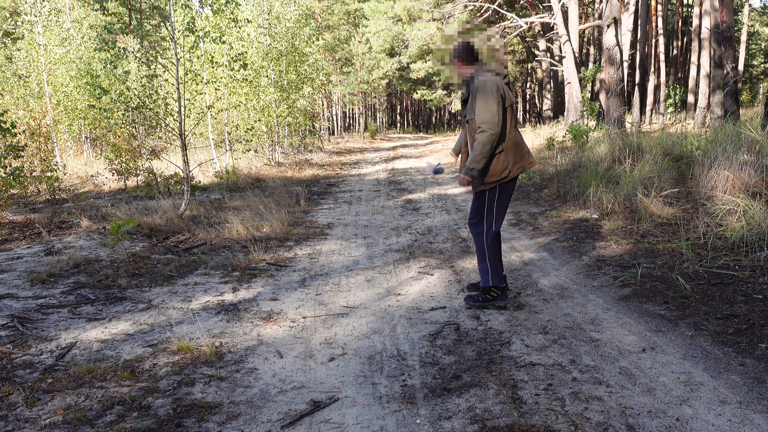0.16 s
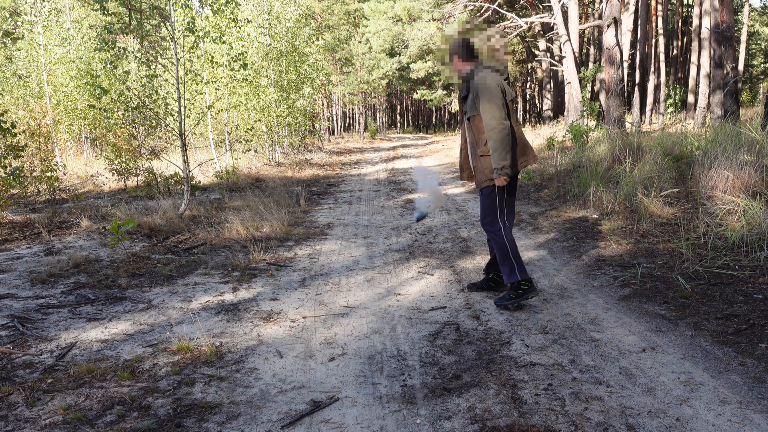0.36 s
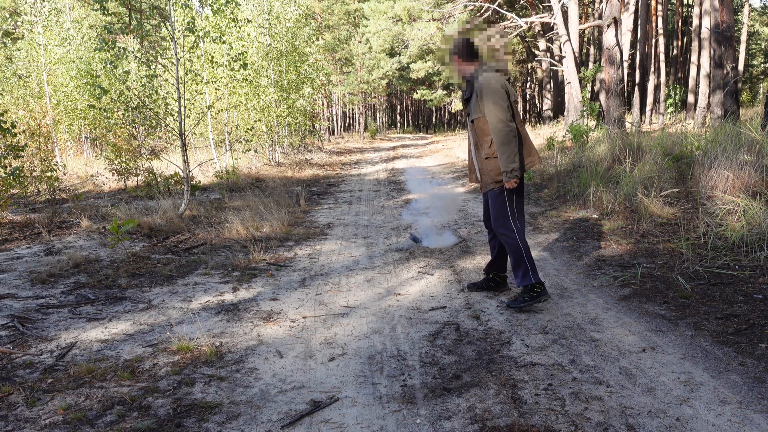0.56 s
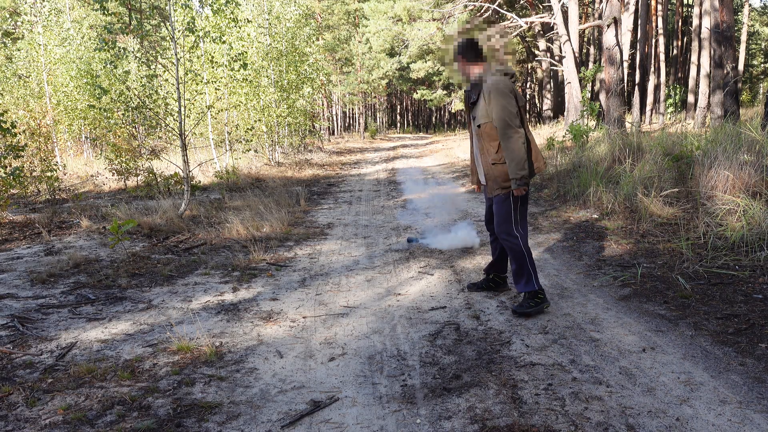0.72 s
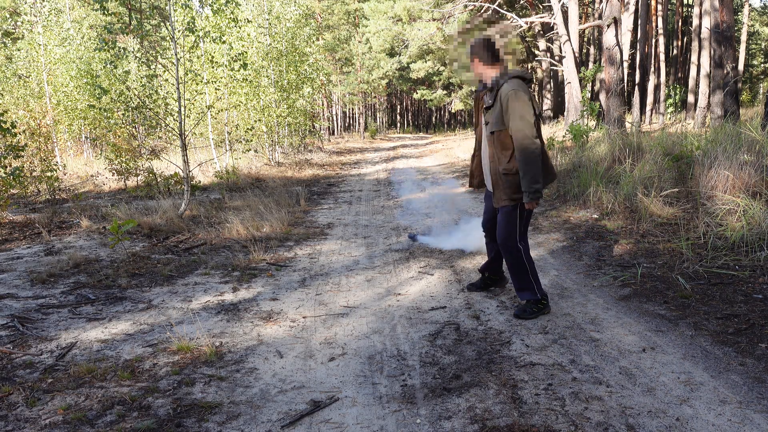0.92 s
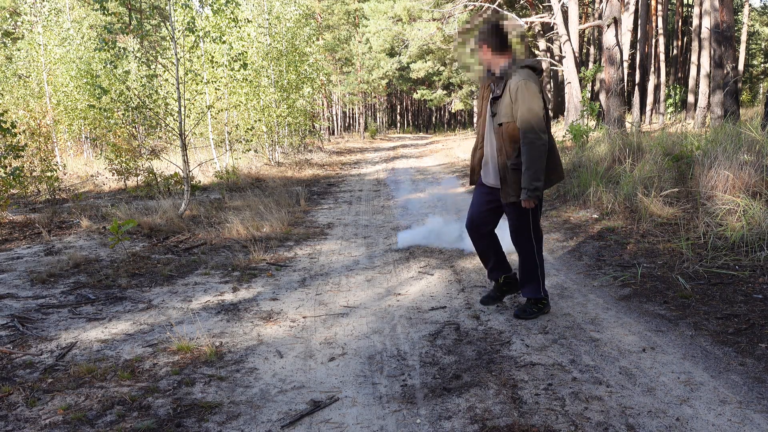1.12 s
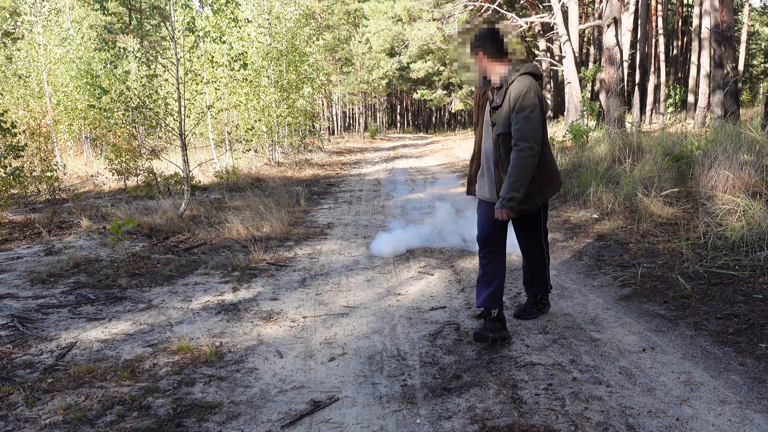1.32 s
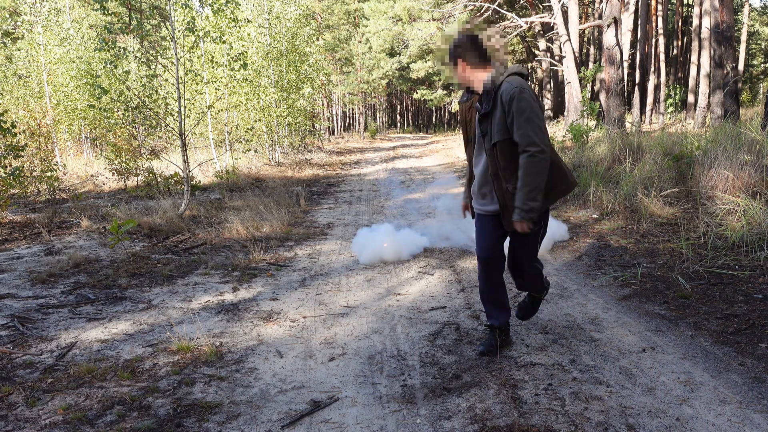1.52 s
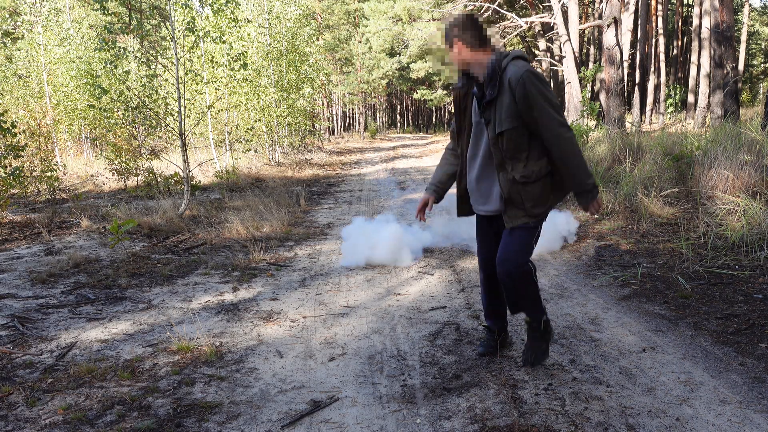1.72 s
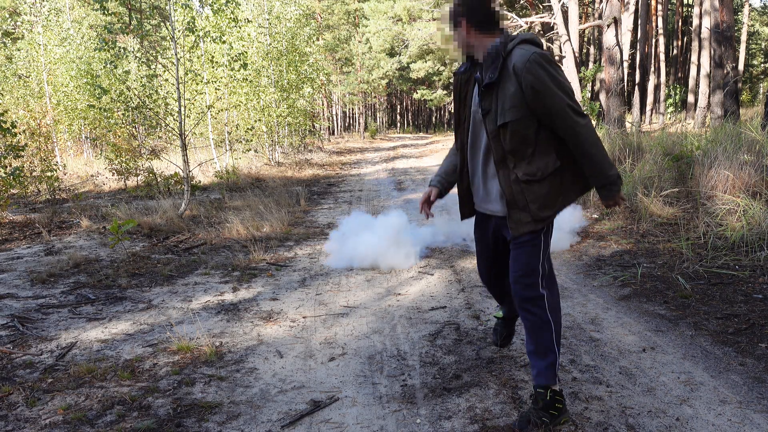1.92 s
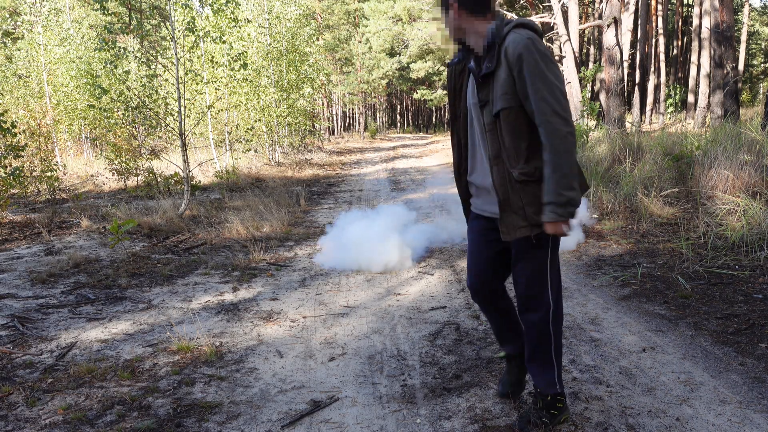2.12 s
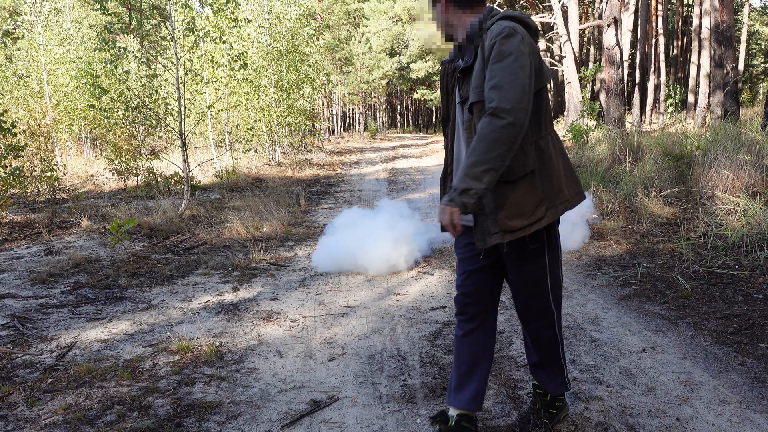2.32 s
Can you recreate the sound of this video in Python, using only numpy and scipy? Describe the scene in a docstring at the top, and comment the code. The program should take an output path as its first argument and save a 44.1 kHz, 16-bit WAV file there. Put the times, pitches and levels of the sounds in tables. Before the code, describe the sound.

A smoke canister hisses outdoors. After a moment of faint forest air, a sharp double crack with a brief metallic ring comes at 0.07 s, and a gas jet bursts out at once. The hiss starts smooth and strong, dips and swings in brightness as it tumbles, turns thinner and hollow around 0.6-1.2 s, surges near 1.3 s, then spits and crackles densely until the end at about 2.4 s.

```python
"""Forest air; at 0.07 s a thrown smoke canister cracks alight: noise bursts, the second ringing the casing.
A jet vents at once: smooth hiss in five bands, with spurts and ever more spitting crackle.
It tumbles over the sandy track, so its brightness swings; delayed copies off casing and sand notch the hiss.
From about 0.6 s it lies on its side and a resonance is hollowed out of the hiss, until about 1.27 s."""
import sys
import numpy as np
from scipy import signal
from scipy.fft import rfft, irfft
from scipy.io import wavfile
from scipy.ndimage import map_coordinates

SR = 44100
rng = np.random.default_rng(int(sys.argv[2]) if len(sys.argv) > 2 else 0)


def log_audio(samples):
    """Write samples as a 16-bit WAV file to the path given in sys.argv[1]."""
    # one column per channel
    frames = np.atleast_2d(samples).T
    # limit to full scale, then quantise
    limited = np.clip(frames, -1, 1)
    pcm = np.round(limited * 32767).astype(np.int16)
    wavfile.write(sys.argv[1], SR, pcm)


N = 104120
TIME_S = np.arange(N) / SR
FREQ_HZ = np.maximum(np.fft.rfftfreq(N, 1 / SR), 1)


def amp(db):
    """dB to amplitude factor."""
    return 10 ** (np.asarray(db) / 20)


def rms_one(x):
    """Scale each row to RMS 1."""
    return x / np.sqrt(np.mean(x ** 2, axis=-1, keepdims=True) + 1e-20)


def in_time(rows):
    """Interpolate each table column over the scene's time."""
    at_s, *columns = np.transpose(rows)
    return [np.interp(TIME_S, at_s, column) for column in columns]


def coloured(x, points, weight=1):
    """Filter by a (hz, db) table, interpolated over log frequency."""
    at_hz, db = np.transpose(points)
    gain = amp(np.interp(np.log(FREQ_HZ), np.log(at_hz), db))
    return irfft(rfft(x) * gain * weight, N)


def drift(rate_hz):
    """Slow random wander of RMS 1: noise through a double one-pole low-pass."""
    r = np.exp(-2 * np.pi * rate_hz / SR)
    noise = rng.standard_normal(N + SR)
    return rms_one(signal.lfilter([1], [1, -2 * r, r * r], noise)[SR:])


def low(x, hz):
    """Second-order low-pass."""
    return signal.sosfilt(signal.butter(2, min(hz, 19000), fs=SR, output="sos"), x)


def high(x, hz):
    """Second-order high-pass."""
    return signal.sosfilt(signal.butter(2, hz, "high", fs=SR, output="sos"), x)


# forest air level: time_s, level_db
AIR_LEVEL = [(0, -53.5), (.07, -53.5), (.15, -49), (2.36, -54.5)]
# forest air spectrum: freq_hz, density_db_per_hz (relative)
AIR_COLOUR = [(24, -61), (40, -40), (139, -8.5), (408, -16), (841, -6), (1460, -20), (1610, -10.5),
              (15600, -25)]


def forest_air():
    """Steady broadband air as coloured noise; two independent rows: mid, side."""
    level_db, = in_time(AIR_LEVEL)
    return amp(level_db) * rms_one(coloured(rng.standard_normal((2, N)), AIR_COLOUR))


# ignition cracks: start_s, level_db (before halving and flattening), hold_s, ring_share (0-1)
CRACKS = [(.0701, -13, .0004, .2), (.0722, -3, .0017, 1)]
# crack noise spectrum: freq_hz, gain_db
CRACK_COLOUR = [(100, -30), (600, -16), (1500, -4), (3000, 0), (9000, -2), (15000, -6)]
# casing ring modes: freq_hz, level_db (peak against noise RMS)
CRACK_RINGS = [(850, -8), (1500, 1), (3050, -3), (3900, 3)]
CRACK_TAIL_S, CRACK_TOP, CRACK_BASS_CUT_HZ = .0005, .36, 280


def cracks():
    """Noise and casing-ring bursts, held, then decaying exponentially; peaks saturate."""
    noise = rms_one(coloured(rng.standard_normal((2, N)), CRACK_COLOUR))
    out = 0
    for start_s, level_db, hold_s, ring_share in CRACKS:
        age_s = TIME_S - start_s
        modes = sum(amp(db) * np.sin(2 * np.pi * hz * age_s) for hz, db in CRACK_RINGS)
        ring = ring_share * modes * [[1], [0]]   # mid only
        envelope = (age_s > 0) * np.exp(-np.maximum(age_s - hold_s, 0) / CRACK_TAIL_S)
        out = out + amp(level_db) * envelope * (noise + ring) / 2
    flat = CRACK_TOP * np.tanh(out / CRACK_TOP)
    return high(flat, CRACK_BASS_CUT_HZ)


# jet levels before flutter, spurts and trim:
# time_s, presence_db, then against presence: bass_db, low_mid_db, treble_db, top_treble_db
JET = [(0.08, -25, -21, -12, -6, -8), (0.092, -27, -21, -3, -7, 0), (0.1, -19.5, -18.5, -3, 1, -4.5),
       (0.21, -18, -18.5, 2, -6, -11.5), (0.31, -27, -20, 2.5, -10, -24), (0.36, -31, -13, 4, -10, -9.5),
       (0.46, -30, -15.5, 5, 0.5, 1.5), (0.49, -24.5, -13, 0.5, -1, -4), (0.55, -30.5, -11.5, 2, 2, 6),
       (0.58, -27.5, -17, -4, -2.5, 1), (0.61, -30, -16, 1, -2, 2), (0.77, -28.5, -19, -1, 4, 11),
       (0.81, -25, -22.5, -7, -3.5, -0.5), (0.93, -32, -18, -1.5, 2.5, 4.5),
       (1.02, -29.5, -21.5, -3.5, 3, 8.5), (1.11, -25.5, -20, -6, -7.5, -8),
       (1.24, -27.5, -26.5, -0.5, -4.5, 0.5), (1.275, -17, -21.5, -5.5, -3.5, -4.5),
       (1.37, -17, -14.5, -3.5, -9, -6.5), (1.54, -23.5, -20.5, -4, -12, -10),
       (1.64, -26, -16.5, -6, -2.5, -9), (1.66, -23.5, -15.5, -6.5, -5, -8), (1.68, -29, -33, -5.5, 3, -5),
       (1.73, -24.5, -17.5, -13, -4, -6), (1.77, -31, -28, -3.5, 2, -1), (1.84, -24, -17, -8.5, -1, -5),
       (1.86, -29, -16, 0, 1, 0), (1.87, -26.5, -20, -10, 1, 1), (1.96, -23, -29, -9.5, 1.5, 4.5),
       (2.0, -26.5, -29, -9.5, 7.5, 8), (2.02, -24, -21.5, -6.5, 5.5, 7.5), (2.16, -20, -21, -10, 1, 0.5),
       (2.18, -16.5, -16.5, -6.5, 0, -2), (2.24, -20, -10.5, -3.5, 0.5, -1.5),
       (2.26, -22.5, -21, -7.5, 3, 2), (2.3, -16.5, -9.5, -6.5, -4, -3), (2.36, -20, -10.5, -11, -1, -3)]
# band centres in JET column order: centre_hz
BAND_HZ = [4000, 500, 1500, 8000, 13000]
# vent spectrum within the bands: freq_hz, density_db_per_hz (relative)
JET_COLOUR = [(24, -71), (40, -30.5), (218, -18), (672, -13.5), (1390, -2.5), (2230, 0), (4710, 1),
              (6190, -1), (15600, -10.5)]
# flutter scale per band when crackle equals hiss: flutter_db
SPUTTER_DB = [2.4, 3.4, 2.6, 1.2, .8]
# part of a spurt's rise reaching each band: share
SPURT_SHARE = [0.66, 0.8, 0.78, 0.63, 0.25]
# part of a spurt's extra bass rise reaching each band: share
BASS_SHARE = [0, .2, 0.25, 0, 0]
# spitting: time_s, crackle_against_hiss_db
SPIT = [(.08, -21), (.4, -15), (.6, -11.5), (.9, -6), (1.3, -3.5), (1.6, -2.5), (1.95, -3), (2.36, -0.5)]
JET_TRIM_DB, JET_RISE_S = -2.5, .0015
CLUMP_RATE_HZ, SPUTTER_RATE_HZ, SLOW_RATE_HZ, SLOW_DB = 60, 156, 7.2, .27


def jet():
    """One turbulent vent split into five fluttering bands, crossfaded over log frequency; rows: mid, side."""
    crackle_db, = in_time(SPIT)
    spurt_db, bass_db = spurts()
    clump = drift(CLUMP_RATE_HZ)
    sputter = 2 * np.tanh(drift(SPUTTER_RATE_HZ) / 2)
    source = vent(crackle_db, spurt_db, clump)
    presence_db, *others_db = in_time(JET)
    log_centres, rank = np.log(np.sort(BAND_HZ)), np.argsort(BAND_HZ)
    out = 0
    for k, relative_db in enumerate([0, *others_db]):
        weight = np.interp(np.log(FREQ_HZ), log_centres, rank == k)
        band = rms_one(coloured(source, JET_COLOUR, weight))
        flutter_db = SPUTTER_DB[k] * amp(crackle_db / 2) * sputter + SLOW_DB * drift(SLOW_RATE_HZ)
        rise_db = SPURT_SHARE[k] * spurt_db + BASS_SHARE[k] * bass_db
        out = out + band * amp(presence_db + relative_db + flutter_db + rise_db + JET_TRIM_DB)
    return out * np.clip((TIME_S - CRACKS[-1][0]) / JET_RISE_S, 0, 1)   # opens with the last crack


# loudest single snaps: start_s
SNAPS = [.7509, .825, .947, 1.0047, 1.0278, 1.0729, 1.1756, 1.2114, 1.2275, 1.4835, 1.5102, 1.5323, 1.6178,
         1.6266, 1.6286, 1.6425, 1.6532, 1.6779, 1.6891, 1.7068, 1.7232, 1.749, 1.7802, 1.8759, 1.8937,
         1.9193, 1.9575, 2.2759]
SNAP_DB = 17   # in the vent, less half the spurt rise
CRACKLES_PER_S, CRACKLE_SPREAD_DB, CLUMP_DB = 900, 9.5, 3   # base rate
PUSH_SHARE = .65   # share of crackles with positive pressure


def vent(crackle_db, spurt_db, clump):
    """Smooth turbulence noise plus clumped random impulses and two-sample snaps; rows: mid, side."""
    size_db = CRACKLE_SPREAD_DB * np.minimum(rng.exponential(1, N), 2)
    sizes = amp(size_db) * np.sign(PUSH_SHARE - rng.random(N))
    rate = CRACKLES_PER_S * amp(CLUMP_DB * clump + spurt_db / 2)
    born = rng.random(N) < rate / SR
    crackle = amp(crackle_db) * rms_one(sizes * born) * [[1], [0]]   # mid only
    out = rng.standard_normal((2, N)) + crackle
    out /= np.sqrt(1 + amp(2 * crackle_db))
    snaps = (np.array(SNAPS) * SR).astype(int)
    out[0, snaps] = out[0, snaps + 1] = amp(SNAP_DB - spurt_db[snaps] / 2)
    return out


# jet spurts, before the band shares: start_s, rise_db, length_s, extra_bass_db
SPURTS = [(0.0948, 4, 0.0064, -6), (0.129, 8, 0.003, -12), (0.174, 4, 0.014, 4), (0.513, 3.5, 0.0064, 10),
          (0.547, 3, 0.018, 21), (0.612, 3, .003, 12), (0.633, 2.5, 0.019, 22), (0.701, 11.5, 0.0029, 6),
          (0.712, 5.5, 0.0062, -12), (0.719, 12.5, 0.0045, 0), (0.724, 7, 0.0074, -10),
          (0.751, 15, 0.002, 35), (0.766, 8, 0.0016, 16), (0.857, 8.5, 0.0055, 31), (0.872, 8, 0.0037, 30),
          (0.9475, 11.5, 0.0021, 7), (1.026, 2, 0.0024, 19), (1.089, 8, 0.0042, 15),
          (1.1746, 4.5, 0.0044, 20), (1.209, 9, 0.003, 17), (1.229, 10, 0.001, -3),
          (1.274, -0.5, 0.0057, 27), (1.335, 3.5, 0.017, -14), (1.481, 7, 0.0087, -10),
          (1.503, 3.5, 0.013, 13), (1.532, 5, 0.001, 18), (1.543, 7, 0.0039, 13), (1.592, 9, 0.0052, 3),
          (1.602, 7, 0.0039, 2), (1.6165, 10, .002, 2), (1.653, 9, 0.007, 4), (1.721, 10, 0.0032, 10),
          (1.748, 3, .003, 10), (1.779, 7, 0.002, 8), (1.794, 4, 0.0068, 37), (1.826, 7.5, 0.029, 12),
          (1.895, 5, 0.005, 14), (1.944, 8.5, 0.0056, 28), (1.96, 12, 0.0025, 23), (2.023, 3.5, 0.011, 16),
          (2.056, 7, 0.0022, 30), (2.096, 5.5, 0.0087, 17), (2.128, 12, 0.0025, -8), (2.133, 12, 0.0024, 9),
          (2.243, 4.5, 0.0093, 6), (2.266, 12, 0.0043, -5)]
SPURT_RISE_S = .0006


def spurts():
    """Pressure surges that jump, hold and fall; rows in dB: all bands, extra bass."""
    out = np.zeros((2, N))
    for start_s, rise_db, length_s, bass_db in SPURTS:
        age_s = TIME_S - start_s
        fall = np.exp(-np.clip(age_s / length_s, 0, 9) ** 3)
        out += np.outer([rise_db, bass_db], np.clip(age_s / SPURT_RISE_S, 0, 1) * fall)
    return out


def echo(x, table, cut_hz):
    """Comb notches: add a dulled copy at a moving delay, scaled down for the added power."""
    delay_ms, strength = in_time(table)
    strength = np.clip(strength, 0, 1.3)
    pole = np.exp(-2 * np.pi * cut_hz / SR)
    dull = signal.filtfilt([1 - pole], [1, -pole], x)
    read_at = np.arange(N) - delay_ms * SR / 1000
    late = np.array([map_coordinates(row, [read_at], order=3) for row in dull])
    return (x + strength * late) / np.sqrt(1 + strength ** 2)


# casing reflection: time_s, delay_ms, strength (0-1)
CASING = [(0, 0.23, 0.9), (.4, 0.24, 0.67), (.48, 0.24, 0.14), (1.15, 0.26, 0.17), (1.27, 0.23, 0.34),
          (1.6, 0.2, 0.32), (1.7, 0.22, 0.28), (2.36, 0.23, 0.08)]
CASING_CUT_HZ = 6900   # one pole, run both ways


def casing_reflection(x):
    """Hiss returned by the canister's own casing after a short path."""
    return echo(x, CASING, CASING_CUT_HZ)


# sand reflection, delay first shortening as the canister falls: time_s, delay_ms, strength (0-1)
SAND = [(0, .7, 0), (.35, 0.57, 0), (.44, 0.44, 0.02), (.5, 0.23, 0.58), (.55, 0.099, 0.18),
        (0.621, 0.11, 0.3), (1.9, 0.14, 0.12), (2, 0.52, 0.08), (2.15, 0.67, 0.07), (2.36, 0.7, 0.21)]
SAND_CUT_HZ = 7800   # one pole, run both ways


def sand_reflection(x):
    """Hiss returned by the sand; the delay follows the path length."""
    return echo(x, SAND, SAND_CUT_HZ)


# hollow, deepest while the canister lies on its side: time_s, depth (0-1)
HOLLOW = [(0, 0), (.58, 0.1), (.68, 0.77), (1.05, 0.6), (1.2, 0.35), (1.27, 0), (2.36, 0.15)]
HOLLOW_HZ, HOLLOW_WIDTH_HZ = 3070, 1030


def hollow(x):
    """Subtract a changing share of one resonance."""
    b, a = signal.iirpeak(HOLLOW_HZ, HOLLOW_HZ / HOLLOW_WIDTH_HZ, fs=SR)
    depth, = in_time(HOLLOW)
    return x - np.clip(depth, 0, 1) * signal.lfilter(b, a, x)


# side gain either side of the split: time_s, below_split_db, above_split_db
WIDTH = [(0, -19, -26), (.3, -11.5, -7.5), (.45, -15, -48), (.7, -24.5, -55), (1.2, -49, -72),
         (1.45, -52, -18), (1.7, -60, -63), (2.36, -57, -60)]
WIDTH_SPLIT_HZ, BASS_EDGE_HZ = 5000, 550
BASS_WIDTH_DB, AIR_SIDE_DB = -17.5, -2   # bass_width is added to the below-split side


def stereo_side(side):
    """Set the width by frequency: scale the side signal below and above the split, and add bass."""
    bass = low(low(side, BASS_EDGE_HZ), BASS_EDGE_HZ)
    split = signal.butter(4, WIDTH_SPLIT_HZ, fs=SR, output="sos")
    below = signal.sosfiltfilt(split, side)
    below_db, above_db = in_time(WIDTH)
    return amp(BASS_WIDTH_DB) * bass + amp(below_db) * below + amp(above_db) * (side - below)


def scene():
    """Mix reflected jet, cracks and air; decode mid and side to left and right."""
    mid, side = sand_reflection(casing_reflection(hollow(jet()))) + cracks()
    air_mid, air_side = forest_air()
    side = stereo_side(side) + amp(AIR_SIDE_DB) * low(air_side, BASS_EDGE_HZ)
    return mid + air_mid + side * [[1], [-1]]


MIC_BASS_CUT_HZ, CUTOFF_HZ = 146, 15720


def record(dry):
    """Clip the peaks, roll off the bass, cut the top steeply."""
    thin = high(np.clip(dry, -.85, .85), MIC_BASS_CUT_HZ)
    top_cut = signal.ellip(14, .3, 75, CUTOFF_HZ, fs=SR, output="sos")
    return signal.sosfilt(top_cut, thin)


dry = scene()
out = record(dry)
log_audio(out)
```